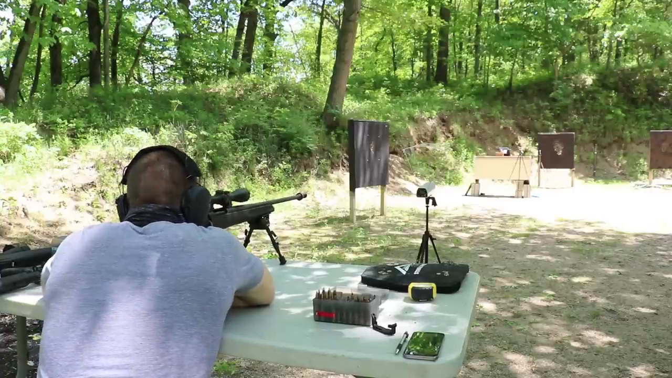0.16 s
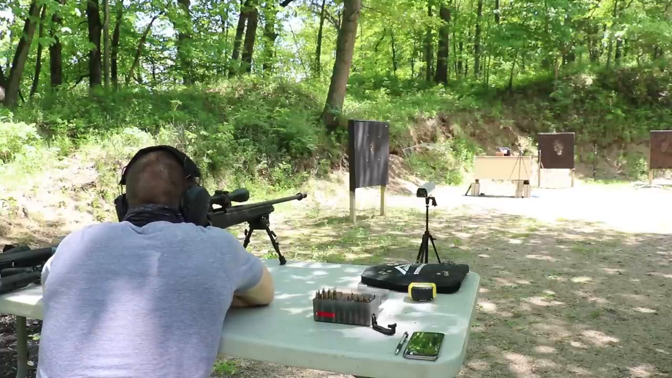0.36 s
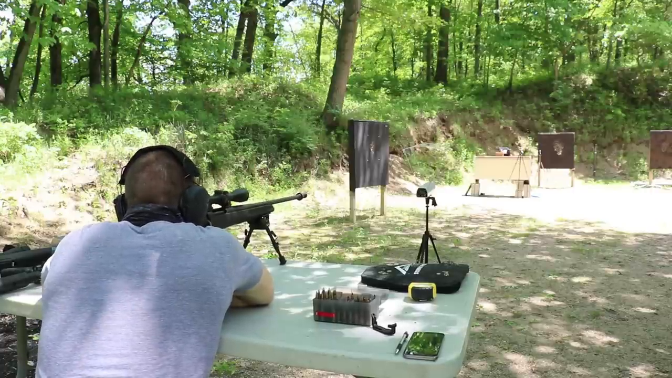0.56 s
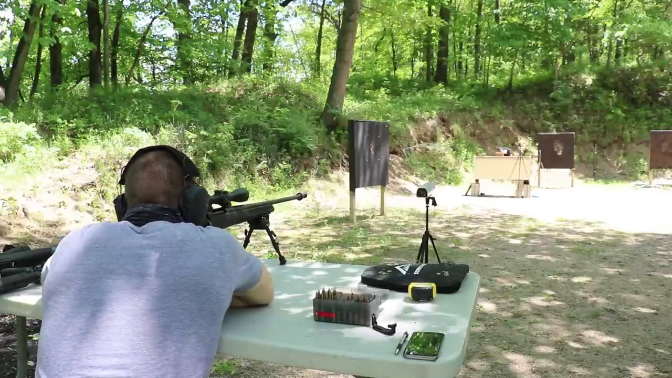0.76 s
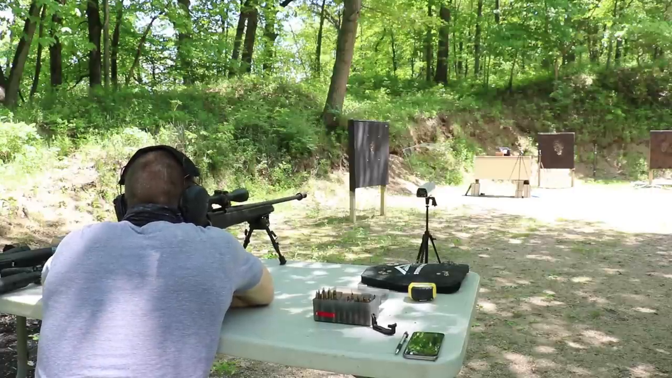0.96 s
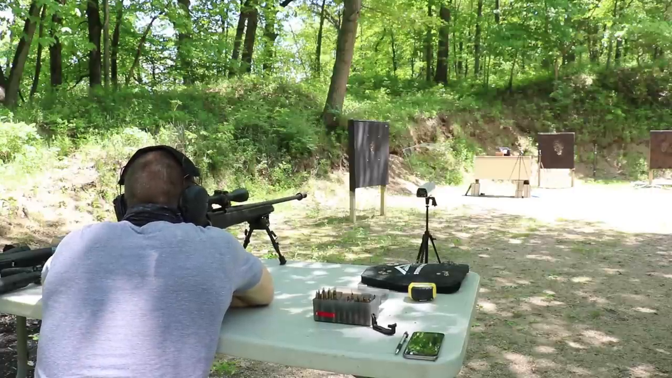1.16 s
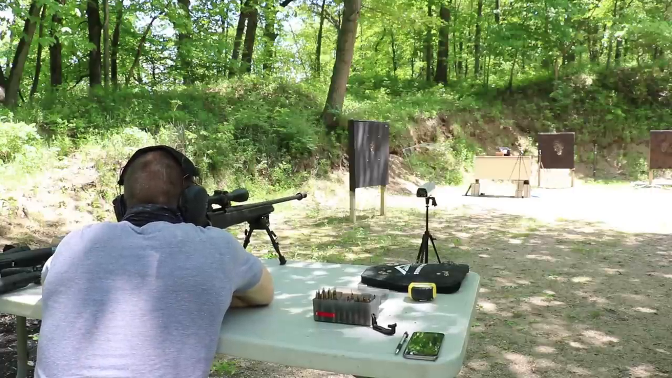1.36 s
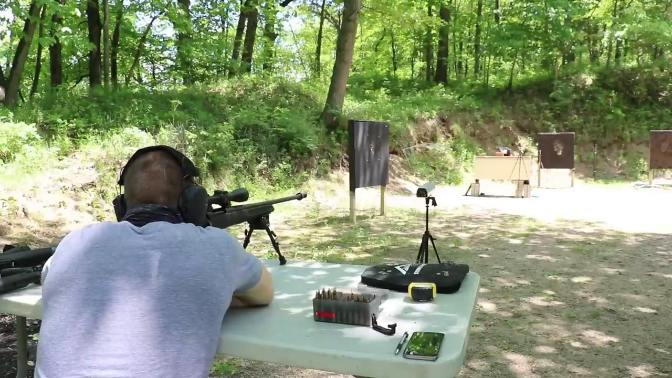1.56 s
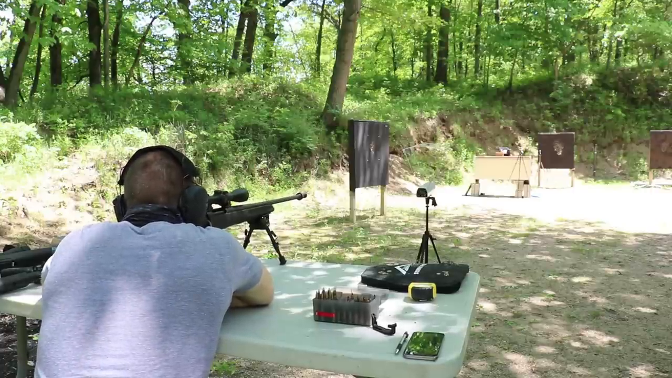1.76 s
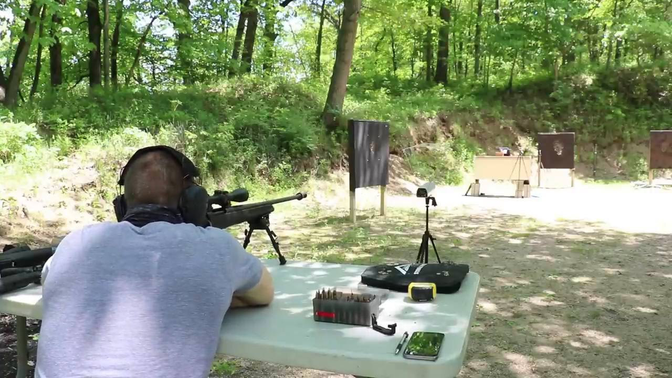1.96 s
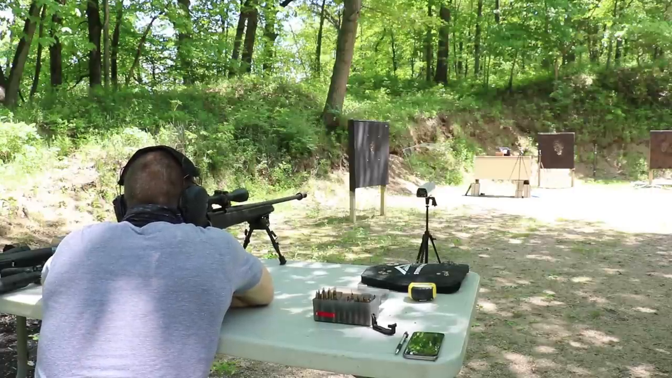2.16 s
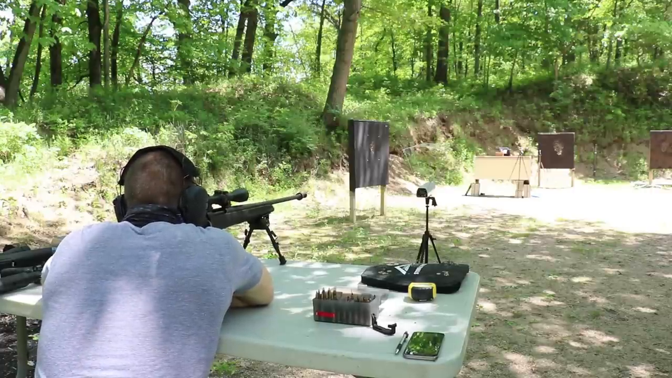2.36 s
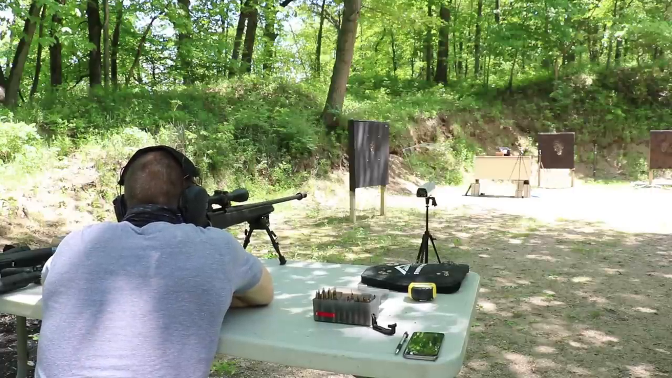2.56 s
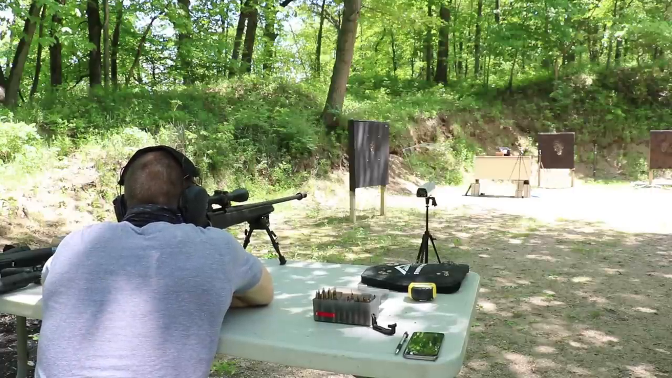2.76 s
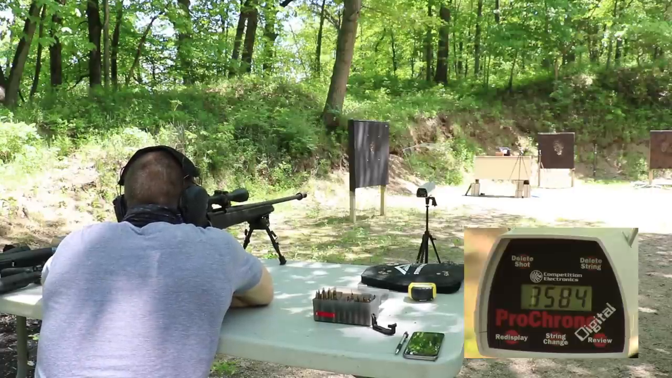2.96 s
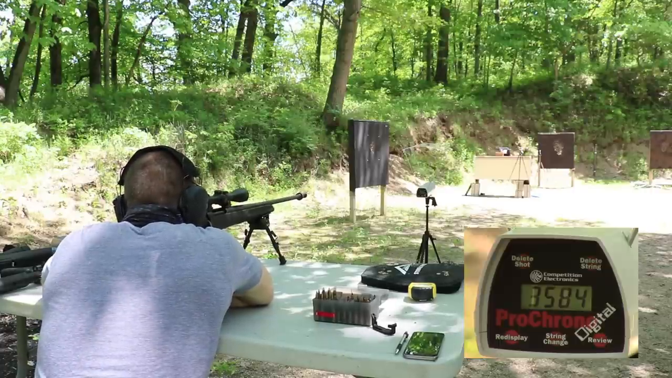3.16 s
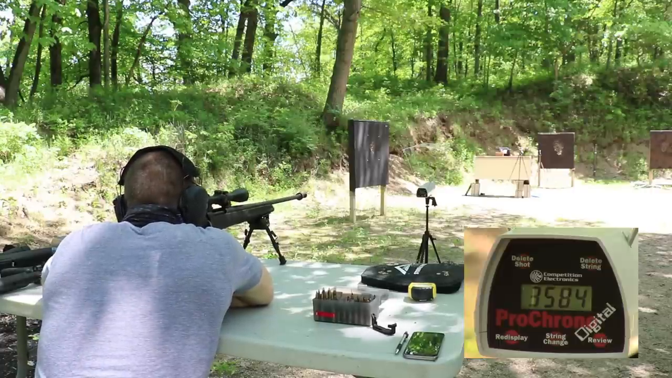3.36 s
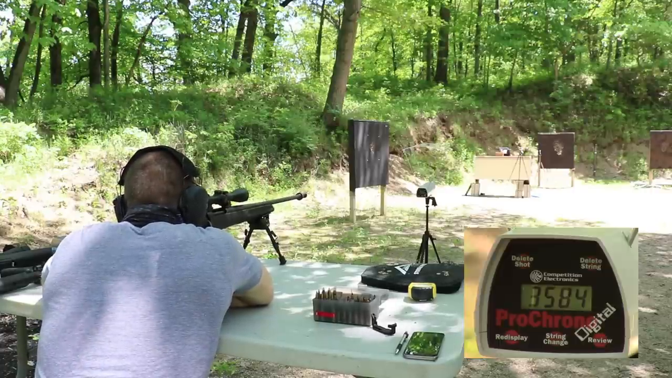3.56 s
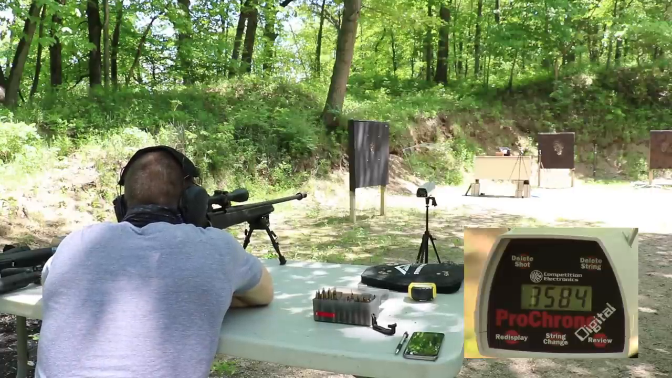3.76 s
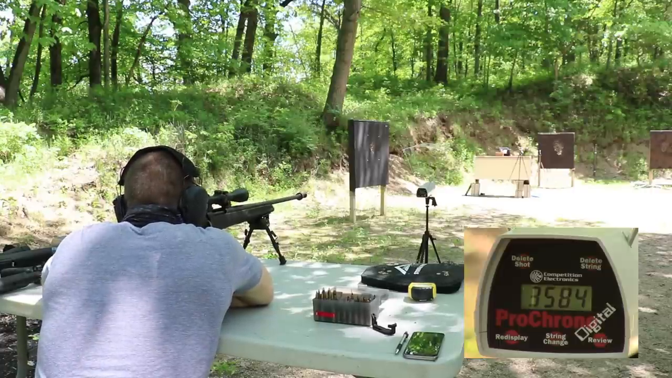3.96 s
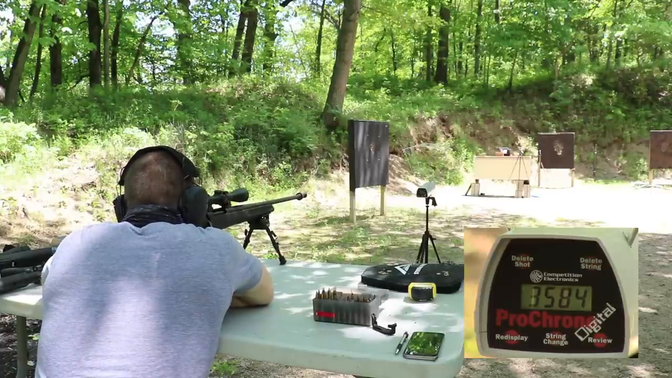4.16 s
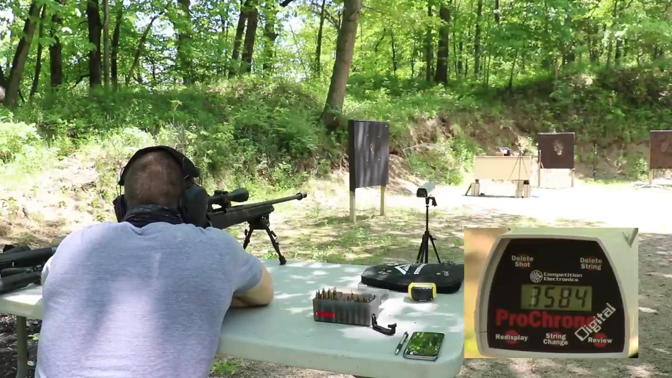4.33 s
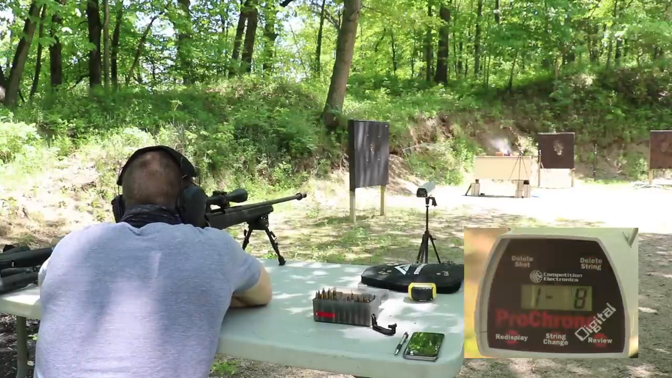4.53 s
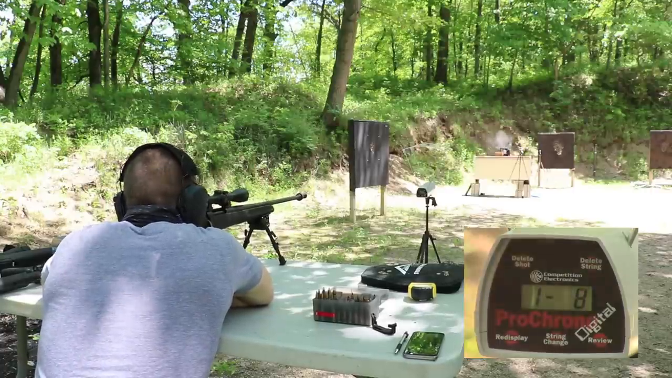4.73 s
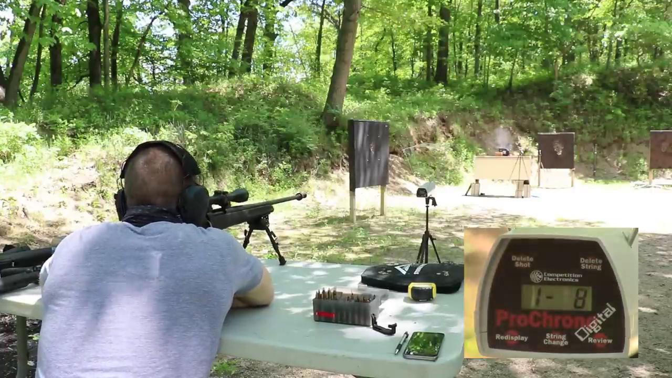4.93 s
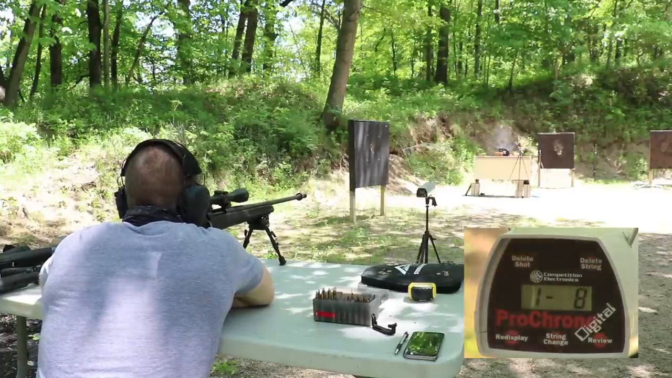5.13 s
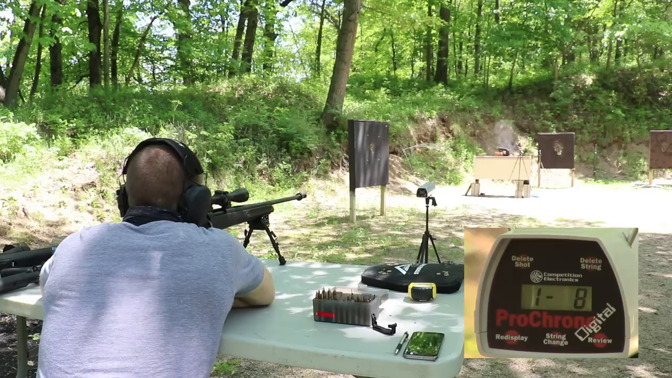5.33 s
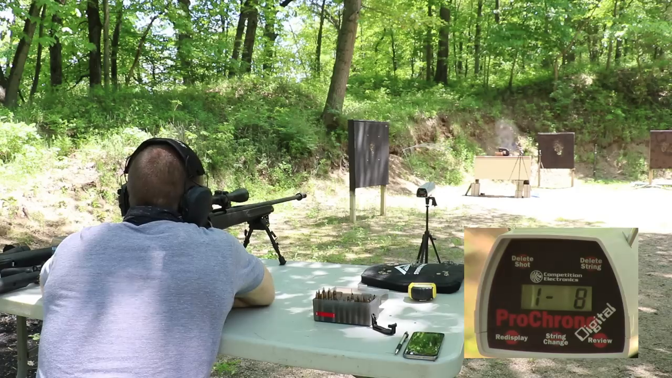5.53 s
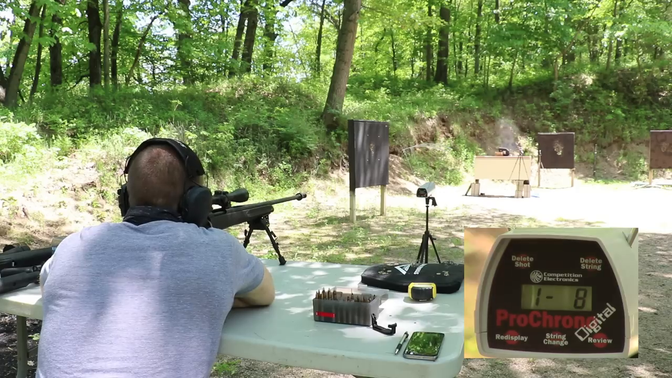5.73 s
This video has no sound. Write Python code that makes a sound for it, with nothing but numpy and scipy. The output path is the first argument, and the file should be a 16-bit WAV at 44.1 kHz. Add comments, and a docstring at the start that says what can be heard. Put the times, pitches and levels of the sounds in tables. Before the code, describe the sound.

Quiet outdoor range with small bird calls and distant low drone, broken late by a single overloaded gunshot and its rumbling woodland echo.

```python
"""One rifle shot at a wooded range, heard from just behind the shooting bench: shaped noise cracks,
a low-mid tone and noise resonances ring. The woods scatter it back as ever darker noise, the hills add a low roll.
Before it, gliding tones and raspy noise make birds sing and chip in the trees over a distant engine's hum,
built from a few sines. The blast overloads the microphone and slams the gain down; small ticks and faint swells
of treble hiss follow."""
import sys
import numpy as np
from scipy import signal
from scipy.fft import rfft, irfft, next_fast_len
from scipy.io import wavfile
from scipy.ndimage import uniform_filter1d

SR = 44100
rng = np.random.default_rng(int(sys.argv[2]) if len(sys.argv) > 2 else 0)


def to_wav(s):
    """Save 16-bit WAV."""
    ch = np.atleast_2d(s).T  # columns
    pcm = np.round(np.clip(ch, -1, 1) * 32767)  # PCM
    wavfile.write(sys.argv[1], SR, pcm.astype(np.int16))


N = 259837
TIME = np.arange(N) / SR

SHOT_S = 4.5447  # when the rifle fires
SHOT_DB = 34  # lift of the whole shot above the levels set in its layers
# Stereo width of the returning sound. Each row: frequency in Hz, left-right likeness (1 is mono).
ECHO_SAME = [(60, 0.77), (1400, 0.69), (3100, 0.69), (6800, 0.33), (15000, .25)]


def gain_of(db):
    """Decibels to gain."""
    return 10 ** (np.asarray(db) / 20)


def evened(x):
    """Scales to rms 1."""
    return x / np.sqrt(np.mean(x ** 2) + 1e-20)


def read(points, hz):
    """Reads a spectrum on a log-frequency axis."""
    f, value = np.transpose(points)
    return np.interp(np.log(hz + 1), np.log(f + 1), value)


def follow(rows, t):
    """Reads every column of a curve at times t."""
    s, *columns = np.transpose(rows)
    return [np.interp(t, s, c) for c in columns]


def add(mix, s, sound):
    """Mixes a sound in at time s."""
    part = mix[..., max(round(s * SR), 0):][..., :sound.shape[-1]]
    part += sound[..., :part.shape[-1]]


def coloured(x, points):
    """Gives a sound the listed spectrum, at rms 1."""
    size = next_fast_len(x.shape[-1], True)
    shaped = rfft(x, size) * gain_of(read(points, np.fft.rfftfreq(size, 1 / SR)))
    return evened(irfft(shaped, size)[..., :x.shape[-1]])


def pair(a, b, same):
    """Two channels of the given likeness from two unrelated signals."""
    same = np.clip(same, -1, 1)
    mid = np.sqrt((1 + same) / 2) * a
    side = np.sqrt((1 - same) / 2) * b
    return np.array([mid + side, mid - side])


def noise(size, same):
    """White stereo noise whose channels are alike as listed by frequency."""
    full = next_fast_len(size, True)
    likeness = read(same, np.fft.rfftfreq(full, 1 / SR))
    first, second = rfft(rng.standard_normal((2, full)))
    return irfft(pair(first, second, likeness), full)[:, :size]


def wander(size, hz):
    """Smooth chance that changes about hz times a second."""
    knots = rng.standard_normal(4096)
    return np.interp(np.arange(size) * hz / SR, np.arange(len(knots)), knots)


def squash(x, drive, bias):
    """Lopsided overload: one side of the wave flattens before the other."""
    return (np.tanh(drive * x + bias) - np.tanh(bias)) / drive


def resonate(x, hz, width):
    """A moving resonance: shifts the curve hz down to zero, smooths twice, and shifts back."""
    turn = np.exp(2j * np.pi * np.cumsum(hz) / SR)
    r = np.exp(-np.pi * width / SR)
    return (turn * signal.lfilter([(1 - r) ** 2], [1, -2 * r, r * r], x / turn)).real


def swells(rows):
    """The gain of a few bell-shaped swells that add in power."""
    return np.sqrt(sum(gain_of(db) ** 2 * np.exp(-((TIME - s) / half_s) ** 2) for s, db, half_s in rows))


def background(level_db=-42.5, swell_db=0.18):
    """Leaves and far-off rumble: wide coloured noise, swelling slightly."""
    # Outdoor air. Each row: frequency in Hz, level in dB.
    air_colour = [(20, -6), (40, -8), (60, 1.5), (90, 2.5), (130, -2.5), (190, -5.5), (280, -16),
                  (450, -18), (850, -18), (1400, -27.5), (2200, -31.5), (5000, -32), (10000, -38),
                  (16000, -38.5)]
    # Its stereo width. Each row: frequency in Hz, left-right likeness (1 is mono).
    air_same = [(25, 0.95), (60, 0.89), (130, 0.62), (290, 0.51), (1400, 0.5), (6000, 0.12), (15000, 0.075)]
    return gain_of(level_db + swell_db * wander(N, 3.74)) * coloured(noise(N, air_same), air_colour)


def engine(flutter=0.12, left_db=1.63):
    """A far engine: only its lowest orders carry, and the air makes them waver."""
    # The engine's pace. Each row: time in seconds, firing rate in Hz, level in dB.
    pace = [(0.0, 92.5, -45), (0.05, 94.4, -38), (0.16, 95.8, -40), (0.3, 91.6, -32.5), (0.41, 91.6, -41.5),
            (0.59, 89.2, -41), (0.63, 89.3, -34.5), (1.13, 89.7, -37), (1.25, 89, -32.5),
            (1.64, 89.9, -37.5), (1.66, 90.1, -39), (1.71, 89.4, -33.5), (2.23, 90.8, -38.5),
            (3.64, 90.4, -34.5), (3.7, 90.4, -39), (3.74, 91.6, -32.5), (4.24, 94, -34.5),
            (4.52, 93.2, -32)]
    # Strength of the side orders against the median firing level. Each row: time in seconds, level in dB.
    load = [(0, -20), (2.9, -36), (3.15, 1), (4.0, 1.5), (4.5, -7)]
    # The side orders. Each row: multiple of the firing rate, level in dB.
    orders = [(.65, -34), (1.39, -12.5), (2, -22.5)]
    hz, db = follow(pace, TIME)
    load_db, = follow(load, TIME)
    phase = 2 * np.pi * np.cumsum(hz) / SR
    hum = gain_of(db) * (1 + flutter * wander(N, 24.72)) * np.sin(phase)
    for k, order_db in orders:
        level = gain_of(np.median(db) + load_db + order_db) * (1 + 0.18 * wander(N, 3.3))
        hum = hum + level * np.sin(k * phase + 0.13 * wander(N, 7.9))
    return np.sqrt(2) * hum * gain_of([[left_db], [-left_db]])


def trees(x, t60=1.0, build_s=0.0024, leaf_loss=30):
    """Trunks and leaves scatter a call into a soft tail; the leaves soak up its treble first."""
    hz, t, z = signal.stft(noise(SR, [(2000, 0.86), (9000, 0.42)]), SR, nperseg=256)
    loss = 60 / t60 + leaf_loss * (hz[:, None] / 8000) ** 3  # dB per second
    z = z * gain_of(-loss * t) * (1 - np.exp(-t / build_s))
    tail = signal.istft(z, nperseg=256)[1]
    return signal.fftconvolve(x[None], tail / np.linalg.norm(tail[0]), axes=1)[:, :N]


def note(hz, db, clear, wet_db=-1.0, buzz_db=-5, buzz_width_hz=660, tremble_db=3.0):
    """One note along the curve hz, as (direct, into the trees); less clear means more buzz and less direct."""
    clear = np.clip(clear, 0, 1)
    blur = (1 - clear) ** 2
    hz = hz * (1 + .045 * blur * wander(len(hz), 400))
    whistle = np.sqrt(2) * np.sin(2 * np.pi * np.cumsum(hz) / SR)
    buzz = gain_of(buzz_db) * evened(resonate(rng.standard_normal(len(hz)), hz, buzz_width_hz))
    shape = gain_of(db + tremble_db * wander(len(hz), 108)) * signal.windows.tukey(len(hz), .25)
    return shape * np.array([clear * whistle, gain_of(wet_db) * (0.39 * whistle + 2 * blur * buzz)])


def songbirds(scoop=0.013, scoop_s=0.014, linger=2.0, slur_swell_db=3, mew_rise=0.059, mew_clear=.45):
    """Whistles scoop up to pitch; slurs linger at their high end, louder low down; nasal calls ease upward."""
    # Each row: start in seconds, length in seconds, pitch in Hz, level in dB before clearness, clearness 0-1.
    whistles = [(0, 0.069, 2540, -50.5, 0.38), (0.462, 0.066, 6720, -45, 0.4),
                (.495, 0.049, 4900, -43, 0.35), (0.659, 0.091, 4240, -44.5, 0.54),
                (0.748, 0.09, 4900, -48.5, 0.43), (1.0, 0.069, 4740, -46.5, 0.44),
                (1.048, 0.08, 5750, -49, 0.47), (1.185, .05, 3520, -52, 0.32),
                (1.273, 0.075, 4690, -45.5, 0.32), (1.38, 0.061, 3530, -57, .7),
                (1.684, 0.078, 4170, -53, 0.6), (1.912, 0.039, 3695, -45, 0.41),
                (1.977, .14, 7120, -53.5, 0.4), (2.137, 0.098, 4240, -58, 0.6),
                (2.422, .075, 4250, -51.5, 0.74), (2.679, 0.075, 4567, -52, 0.99),
                (3.09, 0.054, 2619, -57, 0.49), (3.224, 0.057, 3000, -60, 0.66), (3.69, .04, 4515, -62, .9)]
    # Each row: start in seconds, length in seconds, first pitch in Hz, last pitch in Hz,
    # level in dB before clearness, clearness 0-1.
    slurs = [(0.801, 0.064, 5400, 6460, -43.5, 0.28), (.97, 0.043, 3920, 4700, -42, 0.2),
             (1.34, 0.06, 7720, 4900, -44.5, 0.33), (1.606, 0.047, 7820, 4600, -42.5, .38),
             (1.815, 0.056, 4200, 5520, -43, 0.48), (1.949, .06, 4440, 5530, -43, 0.46),
             (2.046, 0.052, 6380, 5300, -45, 0.45), (2.11, 0.036, 4396, 3590, -49, 0.43),
             (2.602, 0.039, 6830, 6070, -52, 0.55), (2.91, .1, 3640, 3370, -53, 0.56),
             (3.05, 0.065, 3300, 2750, -54, 0.46), (3.12, .025, 5990, 4720, -51.5, 0.5),
             (3.373, 0.024, 6200, 4440, -56, 0.59), (3.836, 0.089, 4440, 3316, -60, 0.68),
             (3.94, 0.079, 3500, 2430, -56, 0.33), (4.25, 0.028, 5200, 3710, -60, .55)]
    # Nasal calls. Each row: start in seconds, length in seconds, final pitch in Hz, level in dB before partials.
    mews = [(2.926, 0.081, 1173, -55), (3.099, 0.085, 1205, -55), (3.426, .24, 1175, -52.5)]
    # Partials of a nasal call. Each row: multiple of the pitch, level in dB.
    mew_partials = [(5, -7), (6, -1), (7, -14)]
    out = np.zeros((2, N))  # direct, into the trees
    for s, length, hz, db, clear in whistles:
        t = np.arange(int(length * SR)) / SR
        add(out, s, note(hz * (1 - scoop * np.exp(-t / scoop_s)), db, clear))
    for s, length, from_hz, to_hz, db, clear in slurs:
        u = np.linspace(0, 1, int(length * SR))
        below_top = (u if from_hz > to_hz else 1 - u) ** linger
        hz = max(from_hz, to_hz) - abs(to_hz - from_hz) * below_top
        add(out, s, note(hz, db + slur_swell_db * (below_top - .5), clear))
    for s, length, hz, db in mews:
        u = np.linspace(0, 1, int(length * SR))
        for k, partial_db in mew_partials:
            add(out, s, note(k * hz * (1 - mew_rise * (1 - u) ** 2), db + partial_db, mew_clear))
    direct, scattered = out
    return direct + trees(scattered)


def twitter(note_s=.03, spread_hz=700, glide=.08, rasp=0.0372, count=16):
    """Far birds: each burst is a run of short random glides, heard only through the trees."""
    # Bursts deeper in the woods. Each row: start in seconds, length in seconds, centre in Hz, level in dB.
    bursts = [(0, 0.057, 6180, -52.5), (0.042, 0.46, 3342, -61.5), (.21, .06, 4770, -53.5),
              (0.284, 0.11, 6270, -54.5), (0.519, 0.13, 6420, -53), (0.684, 0.28, 3253, -60),
              (1.05, .08, 6310, -52.5), (1.3, 0.21, 3100, -60.5), (1.414, .22, 6300, -55),
              (1.76, 0.064, 3616, -58.5), (2.05, 0.12, 6170, -57), (2.099, .14, 4122, -64),
              (2.299, .16, 3040, -57), (3.201, 0.13, 3076, -57), (3.957, 0.25, 3092, -63),
              (3.942, 0.3, 4486, -67)]
    out, u = np.zeros(N), np.linspace(-1, 1, int(note_s * SR))
    for s, length, centre_hz, db in bursts:
        burst = np.zeros(int(length * SR) + len(u))
        for k, (when, pitch, slope) in enumerate(rng.uniform(-1, 1, (count, 3))):
            bend = np.exp(glide * slope * u + rasp * wander(len(u), 705))
            hz = (centre_hz + spread_hz * pitch) * bend
            chirp = np.hanning(len(u)) * np.sin(2 * np.pi * np.cumsum(hz) / SR)
            add(burst, (k + when / 2) / count * length, chirp)
        add(out, s - note_s / 2, gain_of(db) * evened(burst))
    return trees(out)


def chips(length_s=0.024, direct_db=-3, wet_db=4, top_hz=9300, bottom_hz=4500, rasp=0.52, rasp_hz=1500):
    """A bird's hard chip: a raspy plunge in pitch that sets the woods ringing."""
    # Sharp calls. Each row: start in seconds, level in dB before the direct and wet gains.
    calls = [(0.192, -43), (0.853, -45), (1.412, -46.5), (1.882, -46), (2.361, -46.5), (2.998, -47),
             (3.707, -50)]
    # Colour of the rasp. Each row: frequency in Hz, level in dB.
    chip_colour = [(1500, -44), (2600, -38), (4000, 2), (5000, 7.5), (7000, 1.5), (8800, -9), (10500, -4),
                   (14000, -22), (16000, -34)]
    dry, u = np.zeros(N), np.linspace(0, 1, int(length_s * SR))
    hz = top_hz * (bottom_hz / top_hz) ** u
    shape = signal.windows.tukey(len(u), .15) * np.exp(-.8 * u)
    for s, db in calls:
        plunge = evened(resonate(rng.standard_normal(len(u)), hz, rasp_hz))
        call = 0.78 * plunge + rasp * coloured(rng.standard_normal(len(u)), chip_colour)
        add(dry, s, gain_of(db) * call * shape)
    return gain_of(direct_db) * dry + gain_of(wet_db) * trees(dry, t60=0.98)


def muzzle(crack_db=-5, hold_s=0.0028, fall_s=0.0016, rise_s=0.00021):
    """The crack: a few milliseconds of violent broadband pressure."""
    # Colour of the crack. Each row: frequency in Hz, level in dB.
    crack_colour = [(40, -15), (150, 2.5), (600, -5.5), (1150, 1), (2600, -20), (3600, -6), (5600, -15),
                    (7200, -9.5), (9700, -19.5), (12000, -16), (16000, -24)]
    lead = 128  # samples of rise ahead of the shot
    t = (np.arange(2048) - lead) / SR
    shape = np.exp(np.minimum(t, 0) / rise_s - np.maximum(t - hold_s, 0) / fall_s)
    blast = coloured(noise(len(t), [(500, 1.0), (9000, 0.94)]), crack_colour)
    out = np.zeros((2, N))
    add(out, SHOT_S - lead / SR, gain_of(crack_db) * shape * blast)
    return out


def low_ring(level_db=-18, hz=410, fall_s=0.015, rise_s=.002):
    """A short, decaying low-mid ring of wavering pitch, its swings flattened on one side."""
    t = np.arange(8192) / SR
    swing = np.sin(2 * np.pi * np.cumsum(hz * (1 + 0.14 * wander(len(t), 226))) / SR)
    wave = squash(swing, 2.5, -1.2)
    shape = np.exp(-t / fall_s) * (1 - np.exp(-t / rise_s))
    out = np.zeros(N)
    add(out, SHOT_S, gain_of(level_db) * evened(wave - wave.mean()) * shape)
    return out


def bench(level_db=-14, fall_s=0.028, rise_s=0.0011, fizz_db=-15):
    """The blast rings round the bench and the ground, squared off by the overloaded microphone."""
    # Centre of the ringing. Each row: seconds after the shot, frequency in Hz.
    centre_curve = [(0, 534), (.012, 543), (.02, 796), (.028, 1200), (.04, 900), (.15, 800)]
    # Resonances. Each row: multiple of the centre, width in Hz, level in dB.
    resonances = [(.65, 198.2, -4.5), (1, 323, -1.5), (2.2, 600, -4)]
    t = np.arange(8192) / SR
    centre, = follow(centre_curve, t)
    push = noise(len(t), [(400, 0.93), (3000, 0.79)])
    ring = evened(sum(gain_of(db) * evened(resonate(push, k * centre, width)) for k, width, db in resonances))
    wave = squash(ring, 3.2, -1.6)
    fizz_colour = [(1000, -6), (3000, -21), (7000, -8), (16000, -8)]  # (Hz, dB)
    fizz = gain_of(fizz_db) * coloured(noise(len(t), ECHO_SAME), fizz_colour)
    shape = np.exp(-t / fall_s) * (1 - np.exp(-t / rise_s))
    out = np.zeros((2, N))
    add(out, SHOT_S, gain_of(level_db) * (evened(wave - wave.mean()) + fizz) * shape)
    return out


def stands(t):
    """Power and brightness of the scatter at times t: each stand's return swells and dies away."""
    # Stands of trees, near to far. Each row: peak time in seconds, level in dB before SHOT_DB,
    # rise in dB per second, fade in dB per second, brightness in dB per octave.
    stand_rows = [(4.574, -23, 420, 400, -1), (4.64, -20.5, 104, 26.5, 0.98), (4.99, -29.5, 150, 11, 0),
                  (5.27, -29.5, 23, 17.5, 0)]
    powers = []
    for s, db, rise, fade, _ in stand_rows:
        below_peak_db = np.maximum(rise * (s - t), fade * (t - s))
        powers.append(gain_of(db - below_peak_db) ** 2 + 1e-20)
    powers = np.array(powers)
    total = powers.sum(0)
    return total, np.array(stand_rows)[:, -1] @ powers / total


def woods(patchy_db=1.0, slap_s=0.002, drive=0.49, overload_s=0.32, bias=0.23):
    """Countless reflections, losing treble with distance; the first ones still overload the microphone."""
    # Colour of the early scatter. Each row: frequency in Hz, level in dB.
    early_colour = [(40, -40), (120, -11), (300, -3), (480, -0.5), (680, -0.5), (1000, -2), (1300, -5),
                    (1800, -5.5), (2600, -9.5), (5000, -13), (8600, -18), (12000, -22.5), (16000, -32)]
    # Loss along the path. Each row: frequency in Hz, loss in dB per second.
    path_loss = [(60, -3), (300, -7.5), (700, -2), (1300, 0), (2800, 7.5), (5500, 20.5), (9000, 33.5),
                 (15000, 86)]
    # Stereo lean. Each row: frequency in Hz, left minus right in dB.
    left_lean = [(200, 1.5), (400, 2), (1200, 0), (8000, .5)]
    # Single slaps from banks and trunks. Each row: start in seconds, level in dB before SHOT_DB.
    slaps = [(4.591, -27), (4.649, -23.5), (4.677, -27), (4.70, -25), (4.825, -23), (4.834, -22.5),
             (4.996, -35), (5.146, -25)]
    hz, t, z = signal.stft(noise(N, ECHO_SAME), SR, nperseg=512, noverlap=384)
    _, bright = stands(t)
    hz, age = hz[:, None], np.maximum(t - SHOT_S - .1, 0)
    tilt_db = bright * np.log2(np.maximum(hz / 1300, 1))
    colour = gain_of(read(early_colour, hz) - read(path_loss, hz) * age + tilt_db)
    # hold the middle band level, so that it does not fade with the treble
    middle = (hz > 600) & (hz < 2000)
    colour /= np.sqrt(np.mean(colour ** 2 * middle, axis=0))
    patches = uniform_filter1d(rng.standard_normal(colour.shape), size=7, axis=0)
    patches = evened(uniform_filter1d(patches, size=6, axis=1))
    lean = gain_of(np.array([1, -1])[:, None, None] * read(left_lean, hz) / 2)
    z = z * colour * lean * gain_of(patchy_db * patches)
    wash = signal.istft(z, nperseg=512, noverlap=384)[1][:, :N]
    wash = squash(wash, 0.014 + drive * np.exp(-np.maximum(TIME - SHOT_S, 0) / overload_s), bias)
    power, _ = stands(TIME)
    u = np.arange(4000) / SR / slap_s
    for s, slap_db in slaps:  # a large surface returns one louder clump
        add(power, s, (gain_of(slap_db) * u * np.exp(1 - u)) ** 2)
    wash = wash * np.sqrt(power) * np.clip((TIME - SHOT_S) / 0.0041, 0, 1)
    # high-pass: removes the low rumble that the overload curve adds to the wash
    return signal.sosfilt(signal.butter(2, 80, "high", fs=SR, output="sos"), wash)


def hills(level_db=-0.5, between_db=-47, left_db=1.3):
    """The low roll comes back in waves, over a faint steady rumble."""
    # Waves of the roll. Each row: peak time in seconds, level in dB before level_db, half-length in seconds.
    rolls = [(4.57, -31.5, .025), (4.83, -40, .015), (4.98, -35.5, .03), (5.13, -30.5, 0.042),
             (5.28, -32, 0.075), (5.42, -34.5, .04), (5.56, -31, 0.038), (5.67, -37, 0.062),
             (5.84, -29, 0.13)]
    # Colour of the roll. Each row: frequency in Hz, level in dB.
    roll_colour = [(25, -45), (40, -19), (55, -22), (90, -4.5), (150, -5.5), (210, 3), (300, -10),
                   (500, -34), (1200, -59)]
    rumble = coloured(noise(N, ECHO_SAME), roll_colour) * gain_of([[left_db], [-left_db]])
    waves = np.hypot(swells(rolls), gain_of(between_db))
    return rumble * gain_of(level_db) * waves * np.clip((TIME - SHOT_S) / .004, 0, 1)


def ticks_and_hiss(fall_s=0.0011, floor_db=-70):
    """Tiny dry ticks of decaying noise, and faint swells of treble hiss after the shot."""
    # Faint handling ticks. Each row: start in seconds, level in dB before SHOT_DB.
    ticks = [(5.2764, -41), (5.7334, -49), (5.785, -50), (5.807, -46), (5.8465, -43), (5.856, -46)]
    # Hiss swells. Each row: peak time in seconds, level in dB before SHOT_DB, half-length in seconds.
    hisses = [(5.38, -60, 0.12), (5.89, -62, 0.077)]
    # Colour of both. Each row: frequency in Hz, level in dB.
    treble_colour = [(1500, -18), (6500, 12.5), (12000, 10), (16000, -13)]
    out, t = np.zeros((2, N)), np.arange(1024) / SR
    for s, db in ticks:
        add(out, s, gain_of(db) * np.exp(-t / fall_s) * coloured(noise(len(t), ECHO_SAME), treble_colour))
    hiss_gain = np.hypot(swells(hisses), gain_of(floor_db)) * (TIME > SHOT_S)
    return out + hiss_gain * coloured(noise(N, ECHO_SAME), treble_colour)


def scene(low_cut_hz=45):
    """The quiet range, then the shot far above it, with little of its deepest bass."""
    shot = muzzle() + low_ring() + bench() + woods() + hills() + ticks_and_hiss()
    shot = signal.sosfilt(signal.butter(1, low_cut_hz, "high", fs=SR, output="sos"), shot)
    return background() + engine() + songbirds() + twitter() + chips() + gain_of(SHOT_DB) * shot


def record(dry, ceiling=0.5, recovery_db=0.53, edge_hz=15850):
    """The input clips, the gain drops at once and creeps back (dB a second); then the band limit."""
    rail = ceiling * gain_of(SHOT_DB)
    clipped = dry / (1 + (dry / rail) ** 8) ** (1 / 8)
    over_db = 20 * np.log10(np.maximum(abs(clipped).max(0) / ceiling, 1))
    # the deepest cut so far, less what has crept back since
    duck_db = np.maximum.accumulate(over_db + recovery_db * TIME) - recovery_db * TIME
    ahead = 100  # samples by which the gain drop leads the peak
    ducked = clipped * gain_of(-np.pad(duck_db[ahead:], (0, ahead), "edge"))
    band_limit = signal.firwin(511, edge_hz, window=("kaiser", 9), fs=SR)
    return signal.oaconvolve(ducked, band_limit[None], "same")


dry = scene()
out = record(dry)
to_wav(out)
```